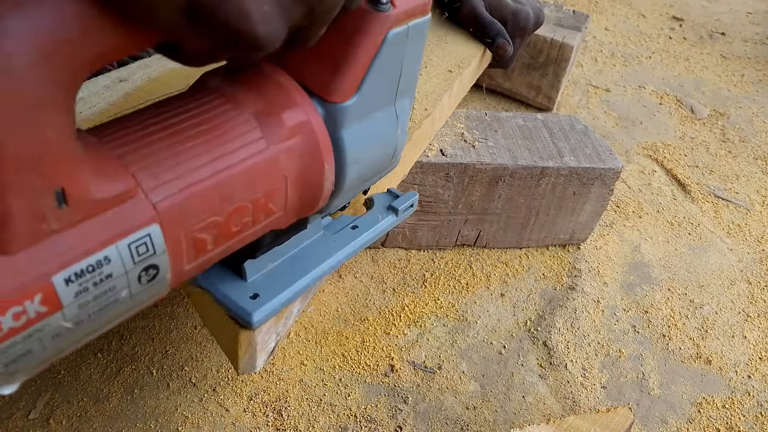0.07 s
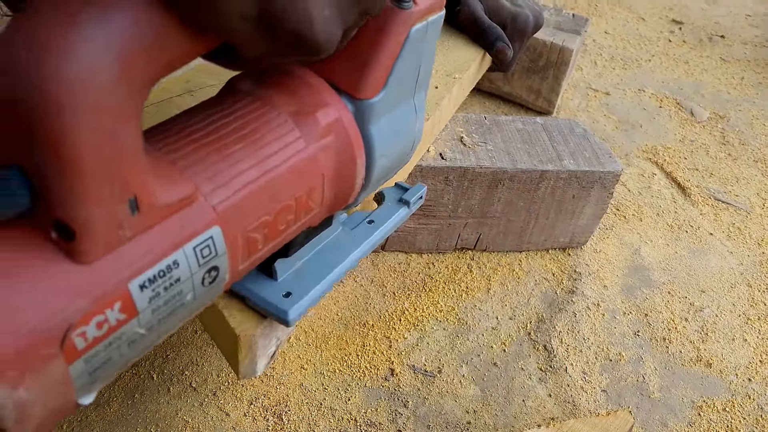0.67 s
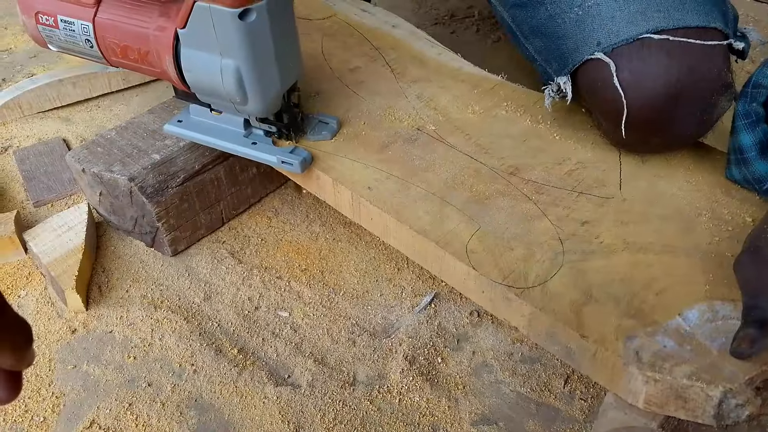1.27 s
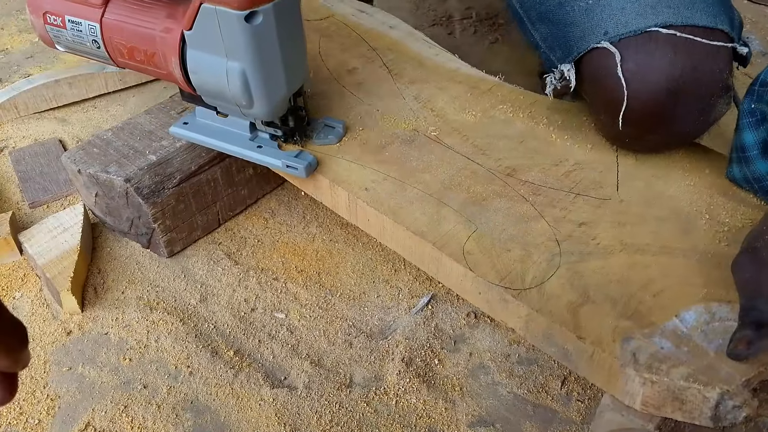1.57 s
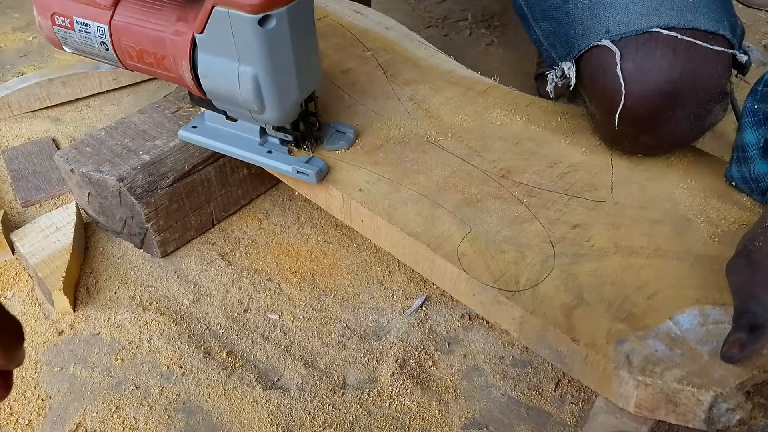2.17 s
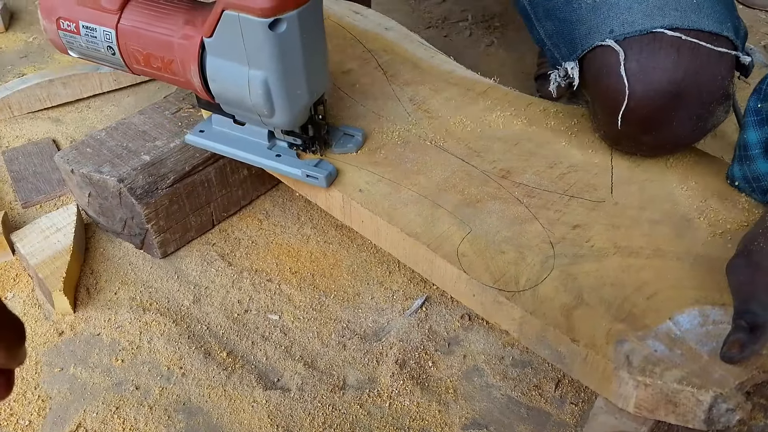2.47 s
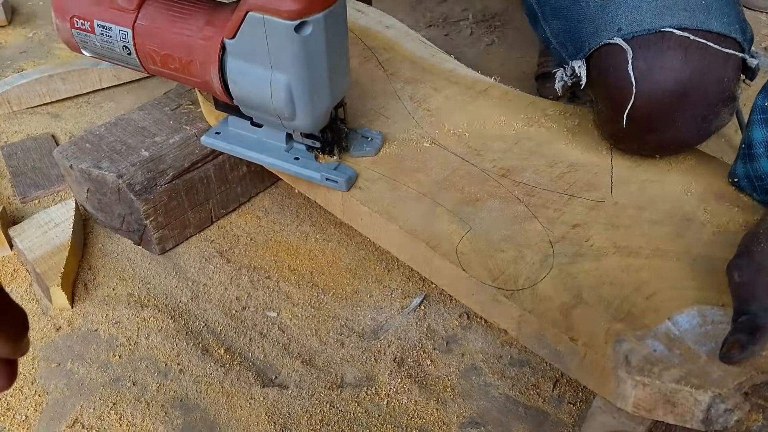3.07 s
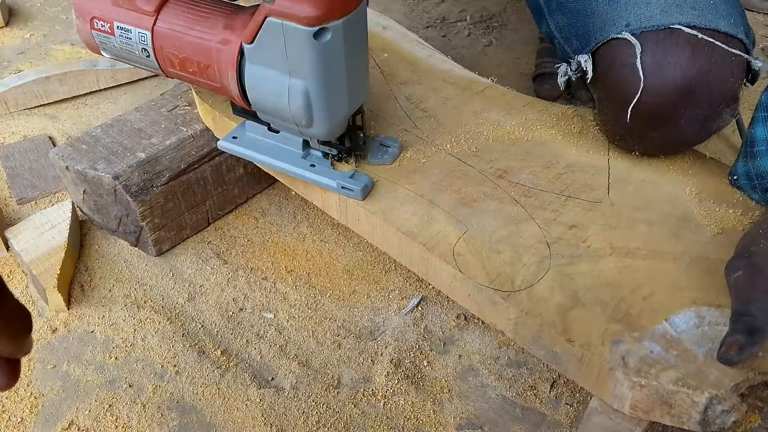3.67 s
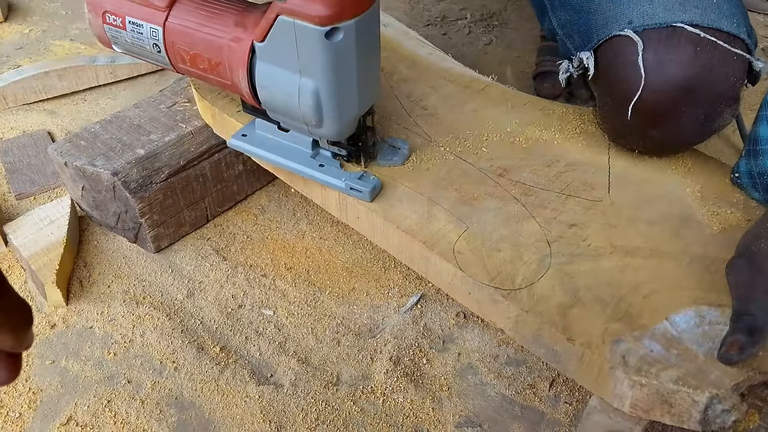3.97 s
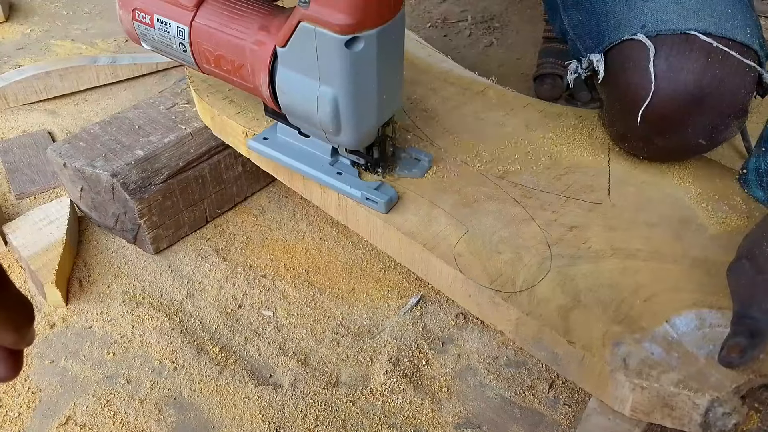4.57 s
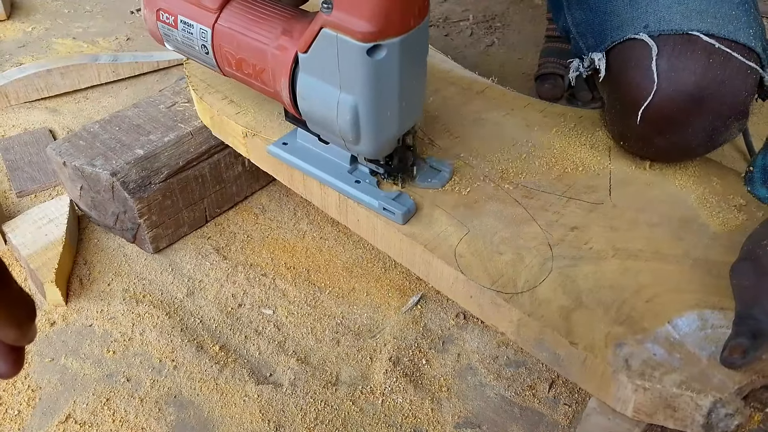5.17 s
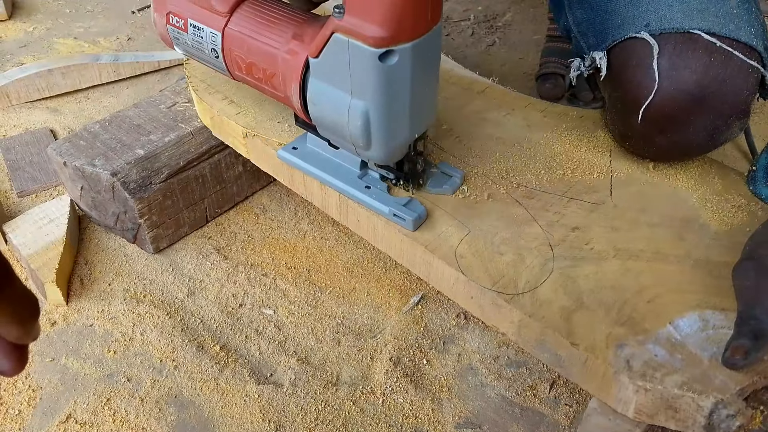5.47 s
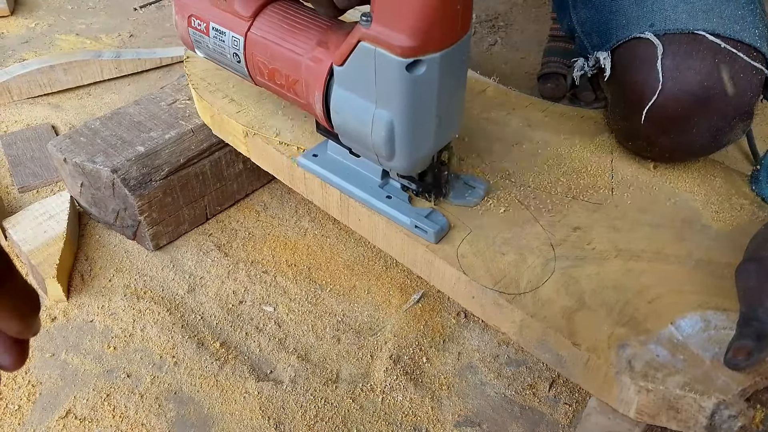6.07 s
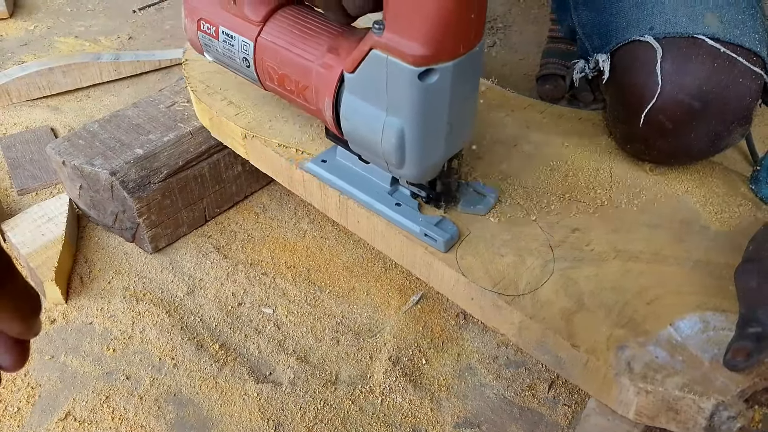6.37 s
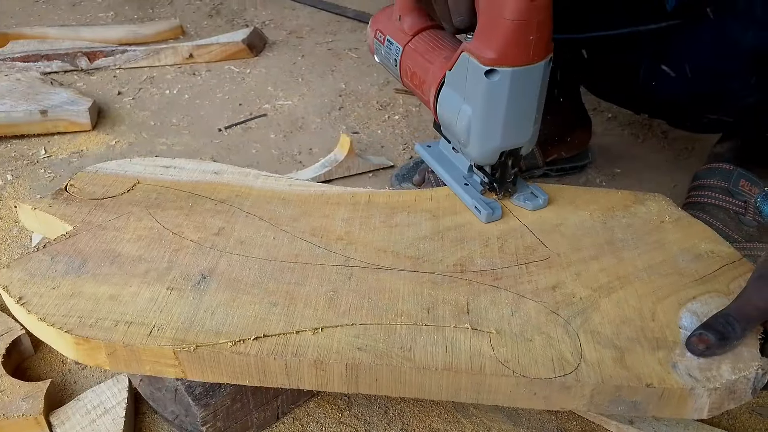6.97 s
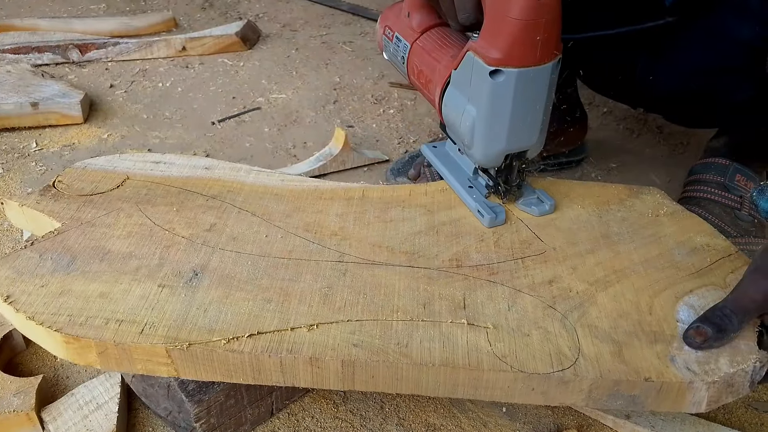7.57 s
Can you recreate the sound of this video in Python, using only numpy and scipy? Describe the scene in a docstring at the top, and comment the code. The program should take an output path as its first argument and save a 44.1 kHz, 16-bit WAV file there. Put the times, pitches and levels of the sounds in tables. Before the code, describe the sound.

An electric jigsaw is cutting a thick wooden plank right from the start, at a fairly slow speed: rapid blade knocks and the rasp of teeth in wood, with a high squeal and gear whine pulsing along. At about 0.7 seconds it breaks off for an instant. By 0.9 seconds it is back, faster and close, a bright, gritty buzz at a steady level. Thin squeals and ringing wood tones come and go as the cut moves along, and the strokes blur into a rougher rasp when the blade binds. The saw's base bumps faintly on the plank now and then, with quick runs of dull thumps from about 4.7 to 6.5 seconds. Around 6.5 seconds the sound dips briefly, then the fast sawing continues from a little farther off, growing slightly louder until it stops at about 7.8 seconds.

```python
"""An electric jigsaw cuts a thick plank. 0-0.7 s, slow: the blade knocks at each turn of its stroke,
its teeth rasp through the wood; blade squeals and gear-mesh whine pulse with each half-stroke.
0.8-6.6 s, fast and close: these tones and plank resonances come and go along the cut;
now and then the shoe bounces on the wood. 6.6-7.8 s: still fast, heard from farther off."""
import sys
import numpy as np
from scipy import signal
from scipy.fft import irfft
from scipy.io import wavfile
from scipy.ndimage import uniform_filter1d, map_coordinates

SR = 44100
rng = np.random.default_rng(int(sys.argv[2]) if len(sys.argv) > 2 else 0)


def dump_mix(stems):
    """Bounce the given channels to the path in sys.argv[1] as a 16-bit WAV at rate SR."""
    frames = np.atleast_2d(stems).T  # one column per channel
    limited = np.clip(frames, -1, 1)  # hard clip at full scale
    pcm = np.round(limited * 32767).astype(np.int16)
    wavfile.write(sys.argv[1], SR, pcm)


N = 345303

# stretches of sawing: start/s, end/s, level/dB, swell/(dB/s), attack/s, offset at onset/dB, release/s
STRETCHES = [(0, 0.692, -25, -0.5, 0.0027, 2, 0.014), (0.826, 6.56, -24, 0.2, .14, -24.5, 0.11),
             (6.55, 7.83, -27.5, 4, 0.085, -10, .01)]
# blade speed, per stretch: t/s, half-stroke rate/Hz
STROKE_RATES = [
    [(0.0, 72.65), (0.288, 72.27), (0.388, 73.2), (0.69, 73.4)],
    [(0.9, 100.6), (1.16, 101.8), (1.46, 103.6), (1.73, 104.8), (1.98, 105.6), (2.6, 102.8), (2.8, 100.5),
     (2.96, 100), (3.22, 100.7), (4.33, 101.1), (4.6, 101.2), (5.08, 101.7), (5.25, 102.3), (5.8, 100.9),
     (5.97, 101.4), (6.5, 101)],
    [(6.6, 105), (6.762, 103.2), (7.106, 105.3), (7.578, 103.4), (7.758, 101.4), (7.82, 101.6)],
]
# grip of the kerf on the blade: t/s, binding/(0-1)
BINDING = [(.06, 0.25), (.28, 0), (.55, 0.57), (.85, 0.45), (1.5, 0.07), (2.3, 0.06), (2.8, 0.29),
           (4.2, 0.22), (4.85, 0.56), (5.2, 0.51), (5.7, 0.55), (6.45, 0.65), (6.65, 0.3), (7.25, 0.21),
           (7.83, 0.61)]
# knock relative to rasp: f/Hz, level/dB
KNOCK_BALANCE = [(100, -10.5), (330, -6.5), (520, 2), (900, 1.5), (2000, -0.5), (4000, -0.5), (5500, -0.5),
                 (7000, 6.5), (10000, -16)]
# teeth catching in the grain: t/s, half-length/s, extra bite/dB
CATCHES = [(6.381, 0.099, 2), (6.734, .03, 7.5), (7.742, 0.18, 2.5)]
# spectrum of saw and plank, per stretch: f/Hz, level/dB
COLOURS = [
    [(30, -34), (150, -27), (380, -22), (560, -12.5), (800, -7), (1000, -16), (1500, -8), (2200, -9),
     (2800, -0.5), (3400, -8), (4500, -1.5), (5400, -6), (6500, -11.5), (9500, -14), (12500, -25),
     (15400, -18)],
    [(30, -27), (100, -22.5), (300, -13.5), (600, -12), (1050, -13), (1400, -10), (2000, -11.5), (2800, -5),
     (3400, -2), (4200, -2.5), (5400, 0), (7200, -11), (9000, -7.5), (10800, -8), (12200, -21.5),
     (13800, -18.5), (15400, -15)],
    [(30, -25), (150, -20.5), (400, -18), (700, -12.5), (1300, -4), (2300, -6.5), (3000, -0.5), (3500, -7),
     (4100, -5.5), (4700, -9.5), (5600, 2), (7000, -6), (9500, -6.5), (12500, -18.5), (15400, -12.5)],
]
# steady resonances, per stretch: f/Hz, width/Hz, gain/dB
STEADY_MODES = [
    [(218, 40, 11.5), (2720, 130, -7), (4040, 260, 7.5)],
    [(929, 77, 7), (2340, 53, 3.5), (4170, 400, 2), (6800, 270, 3)],
    [(583, 87, 5.5), (1340, 70, 6), (1570, 50, 6.5), (2070, 79, 6.5)],
]
# plank resonances and hollows along the cut: middle/s, duration/s, f/Hz, width/Hz, gain/dB
PASSING_MODES = [(1.04, 0.33, 6560, 260, -10), (1.4, 2.5, 7500, 220, -6.5), (0.97, 0.47, 3480, 199, -8),
                 (1.2, 0.8, 8000, 250, 5), (1.4, 1.33, 795, 150, -14), (1.71, 1.92, 2143, 163, -15),
                 (1.8, 0.8, 2690, 170, -12), (1.67, 1.9, 3080, 447, -3.5), (1.63, 1.93, 2900, 105, 11.5),
                 (1.89, 0.72, 625, 60, 6.5), (1.99, 1.27, 2010, 73, 16.5), (2.23, 2.7, 1390, 120, 4),
                 (2.607, 2.72, 501, 57, 10), (2.45, 1.4, 4800, 450, -4.5), (3.3, 1.5, 2034, 160, -12),
                 (3.75, 2.83, 808, 66, 7.5), (3.88, 1.64, 808, 70, 7.5), (4.02, 1.27, 909, 70, 8.5),
                 (3.77, 0.96, 1506, 73.4, 9.5), (3.945, 0.71, 1184, 110, 8.5), (4.518, 0.55, 1440, 110, -8),
                 (5.2, 0.88, 3750, 260, -6), (5.5, 2, 7040, 300, -4.5), (5.096, 0.99, 630, 54, 6.5),
                 (5.5, 2.06, 3500, 230, -4), (5.45, 2.14, 8840, 400.6, 6.5), (5.7, 0.83, 1020, 110, 8),
                 (5.84, 1.4, 5600, 1000, -4.5), (5.9, 1.2, 1630, 130, 9), (6.018, 0.95, 682, 64, 9.5),
                 (6.15, 0.79, 915, 80, 4), (5.83, 1.44, 2720, 180, 4), (6.856, 0.44, 320, 240, -9.5),
                 (6.8, 0.67, 2210, 92, -9), (6.85, .7, 2970, 99, -7), (6.75, 0.68, 6720, 200, -11),
                 (7.55, 0.62, 320, 190, 5), (7.681, 0.64, 5500, 800, 4)]
# tones pulsing with each half-stroke, blade squeals and gear-mesh whine: start/s, end/s, mid f/Hz,
# glide/(Hz/s), fade/s, level re sawing/dB, place in half-stroke/(0-1), burst sharpness, looseness/rad
PULSED_TONES = [(-.1, .75, 2717, 0, .08, -8.5, .95, 1.9, 0.35), (-.1, .75, 3990, 0, .08, -4, 0.3, 6, .7),
                (.17, .28, 3860, 0, .04, -3.5, .3, 2.7, .5), (0, .75, 5300, 0, .08, -9, .2, 4, .9),
                (0.85, 1.33, 4160, 0, .08, -7.5, .1, 1.8, 0.48),
                (1.045, 1.367, 2900, 0, 0.072, -11.5, 0.13, 0.6, 0.33),
                (1.15, 1.9, 5600, 300, .08, -9, .22, 1.9, .55),
                (1.27, 1.733, 3820, 0, .08, -3, 0.06, 2.4, .38),
                (1.0, 1.47, 1370, 0, 0.068, -19, 0, 1.3, 0.52),
                (1.46, 1.74, 1363, 0, .06, -11, 0.28, 0.36, .3),
                (1.72, 2.13, 3890, 0, .06, -7, .05, 2.4, .25),
                (1.8, 2.36, 1374, 0, 0.09, -12.5, .1, 0.59, 0.3),
                (2, 2.71, 4270, -60, 0.067, -2.5, .11, 2.4, 0.24),
                (2, 2.684, 3850, -150, 0.092, -9, 0.05, 2.1, 0.4),
                (2.5, 2.64, 1440, 0, .05, -17, 0, 0.51, 0.4),
                (2.5, 2.98, 1396, 0, 0.061, -13.5, 0.09, 0.8, .4),
                (3, 3.2, 1396, 0, .05, -14.5, 0.08, 0.8, .4), (2.7, 4.4, 4125, 0, 0.11, -15, .1, .6, .2),
                (2.85, 3.08, 3540, 0, .08, -12.5, .05, 1.5, .4),
                (3.114, 4.409, 3785, 0, .08, -11, .05, 0.64, 0.2),
                (3, 4.9, 5300, -100, 0.38, -11.5, .15, 2.6, 0.91),
                (4.88, 5.12, 5250, 0, .06, -9, .15, 3, 0.52),
                (5, 5.28, 4900, -1500, .06, -10.5, 0.1, 3, 0.73),
                (3, 4.5, 4230, 0, .1, -10.5, .15, 1.6, 0.3),
                (4.47, 5.12, 3185, 0, .03, -8.5, .15, 1.6, 0.25),
                (5.08, 5.75, 3160, -50, .25, -9.5, .15, 1.8, .33),
                (5.5, 6.42, 3130, 0, .2, -17.5, .15, .8, .35),
                (5.077, 5.945, 4090, 0, .08, -10.5, 0.24, 2.7, 0.67),
                (5, 5.45, 1350, 0, .08, -21, 0.09, 0.48, 0.31), (4.45, 5.9, 3845, 0, .1, -21, .1, .4, .15),
                (5.68, 5.91, 1615, 0, 0.086, -12, .1, 0.38, 0.21),
                (5.92, 6.52, 3850, 0, .08, -11.5, 1, 1, 0.22),
                (5.88, 6.54, 4150, 0, 0.096, -7.5, .1, 2.1, .45),
                (6.62, 7.65, 3095, -80, .1, -14, .25, 1.4, 0.33),
                (6.7, 7.9, 5730, -540, .15, -10, 0.1, 5, 1.3)]
# gear whine, relative levels: t/s, mesh tone/dB, octave/dB
GEAR_LEVELS = [(0, -12, -3), (.69, -23, -20), (.85, -9, -19), (1.5, -7.5, -22), (2.4, -15, -40),
               (2.9, -8.5, -38), (3.9, -15, -31), (4.6, -16.5, -18), (5.5, -19, -11), (6.3, -18, -26),
               (6.9, -24, -6.5), (7.83, -18, -21)]
# runs of shoe bounces: start/s, count, level/dB, ring f/Hz
BOUNCES = [(0.942, 1, -36, 362), (2.32, 1, -44, 174), (2.376, 3, -32, 355), (2.775, 1, -40, 206),
           (2.82, 1, -41, 175), (3.265, 1, -41, 181), (3.305, 1, -42, 185.1), (3.822, 1, -36, 398),
           (4.718, 9, -38, 361), (5.605, 2, -34.5, 355), (5.654, 2, -37, 413), (5.934, 6, -36, 361),
           (6.675, 1, -47, 180)]


def gain_of(db):
    """Decibels to amplitude."""
    return 10 ** (np.asarray(db) / 20)


def unit_rms(x):
    """Scales to rms 1."""
    return x / np.sqrt(np.mean(x ** 2) + 1e-20)


def spectrum_gain(points, hz):
    """Amplitude from a dB table, interpolated over log frequency."""
    f, db = np.transpose(points)
    return gain_of(np.interp(np.log(hz + 1), np.log(f + 1), db))


def follow(rows, t):
    """Table columns at times t."""
    times, *columns = np.transpose(rows)
    return [np.interp(t, times, column) for column in columns]


def add(mix, start_s, sound):
    """Mixes a sound in at start_s."""
    part = mix[max(round(start_s * SR), 0):][:len(sound)]
    part += sound[:len(part)]


def wander(t, hz):
    """Smooth random curve, rms 1, about hz changes a second."""
    knots = (t - t[0]) * hz
    return unit_rms(map_coordinates(rng.standard_normal(8192), [knots], order=2, mode="wrap"))


def by_binding(t, free, bound):
    """Moves from free to bound as the kerf grips the blade."""
    return free + (bound - free) * np.clip(follow(BINDING, t)[0], 0, 1)


def knocks(half_strokes, distinct, partials=120, shapes=24, spread=0.63, scatter=0.82, ringing=0.871):
    """The blade knocks each half-stroke, tight or rattling; low partials ring through the cycle."""
    low = 1 / (1 + (np.arange(1, partials + 1) / 20) ** 4)
    steps, chance = rng.random((2, partials))
    # delays in cycles: neighbouring partials together in a tight knock, scattered in a loose one
    rattle = spread / 2 * signal.sawtooth(2 * np.pi * np.cumsum(0.26 * steps), 0.5)
    loose = np.linspace(0, scatter, shapes)[:, None]
    delay = rattle * (1 - low) + (chance - 0.5) * (ringing * low + loose * (1 - low))
    spectra = np.pad(np.exp(-2j * np.pi * np.cumsum(delay, axis=1)), [(0, 0), (1, 0)])
    cycles = irfft(spectra, 4096) * 2048
    position = [(1 - distinct) * (shapes - 1), half_strokes % 1 * cycles.shape[1]]
    return map_coordinates(cycles, position, order=1, mode="nearest")


def rasp(t, half_strokes, distinct, depth_db=4.0, chips_db=1.42, lag_cycles=0.19):
    """Teeth tear the fibres in a noise burst just after each knock."""
    burst_db = depth_db * distinct * np.cos(2 * np.pi * (half_strokes - lag_cycles))
    return unit_rms(rng.standard_normal(len(t)) * gain_of(burst_db + chips_db * wander(t, 700)))


def catch_db(t):
    """Short swells of bite where the teeth catch."""
    return sum(db * np.exp(-((t - at_s) / half_s) ** 2) for at_s, half_s, db in CATCHES)


def resonance_db(t, f, modes, fade_s=0.19, patchy_db=3.0, patchy_hz=1500):
    """Steady and passing resonances of saw and plank, plus faint random high ones."""
    def peak(centre_hz, width_hz, db):
        return db * np.exp(-2 * ((f - centre_hz) / width_hz) ** 2)
    steady = sum(peak(*mode) for mode in modes)
    passing = sum(peak(*mode) * np.clip((length_s / 2 - abs(t - middle_s)) / fade_s + 0.5, 0, 1)
                  for middle_s, length_s, *mode in PASSING_MODES)
    patches = uniform_filter1d(rng.standard_normal((len(f), len(t))), size=6, axis=0)
    patches = unit_rms(uniform_filter1d(patches, size=36, axis=1))
    return steady + passing + patchy_db * patches * f / (f + patchy_hz)


def body(t, knock, teeth, colour, modes, bite_hz=2400, ring_hz=1500):
    """The knock shakes the whole plank; the teeth reach mostly its high resonances."""
    hz, frame_s, (knock, teeth) = signal.stft([knock, teeth], SR, nperseg=2048, noverlap=1536)
    frame_s, f = frame_s + t[0], hz[:, None]
    ring_db = resonance_db(frame_s, f, modes)
    tone, balance = spectrum_gain(colour, f), spectrum_gain(KNOCK_BALANCE, f)
    bite_db = (by_binding(frame_s, free=-6, bound=5.5) + catch_db(frame_s)) / (1 + (f / bite_hz) ** 2)
    teeth_db = bite_db + np.minimum(ring_db, ring_db * f / (f + ring_hz))
    drive = (balance * knock * gain_of(ring_db) + teeth * gain_of(teeth_db)) / np.sqrt(1 + balance ** 2)
    treble_rms = np.sqrt(np.mean((tone * gain_of(ring_db)) ** 2 * (f > 2000), axis=0))
    return signal.istft(drive * tone / treble_rms, nperseg=2048, noverlap=1536)[1][:len(t)]


def pulsed_tone(t, half_strokes, rate_hz, row, drift_per_rad=0.004, detune_per_rad=0.014,
                scatter_db=1.5, waver_db=1.74):
    """Blade squeal or gear-mesh whine: one burst each half-stroke, less alike the looser the tone."""
    start_s, end_s, mid_hz, glide_hz_per_s, fade_s, level_db, place, sharpness, loose_rad = row
    active = (t > start_s - fade_s / 2) & (t < end_s + fade_s / 2)
    chance, out = rng.standard_normal((1024, 3)), np.zeros(len(t))
    if active.any():
        now = t[active]
        index, progress = np.divmod(half_strokes[active] - place + 0.5, 1)
        slip, higher, harder = chance[index.astype(int) % len(chance)].T
        pitch_hz = mid_hz + glide_hz_per_s * (now - (start_s + end_s) / 2)
        pitch_hz *= 1 + loose_rad * (drift_per_rad * wander(now, 9) + detune_per_rad * higher)
        phase = 2 * np.pi * pitch_hz * (progress - 0.5) / rate_hz[active] + loose_rad * slip
        burst = np.sin(np.pi * progress) ** sharpness
        burst *= gain_of(scatter_db * harder + waver_db * wander(now, 14.04))
        gate = np.clip(np.minimum(now - start_s, end_s - now) / fade_s + 0.5, 0, 1)
        out[active] = gain_of(level_db) * gate * unit_rms(burst * np.sin(phase))
    return out


def gear_whine(t, half_strokes, mesh_order=37, trim_db=-2, third_db=-25, backlash_rad=0.5):
    """Mesh tone and overtones, loaded at each half-stroke, wavering with the play of the gears."""
    first_db, second_db = follow(GEAR_LEVELS, t)
    mesh = 2 * np.pi * mesh_order * half_strokes + backlash_rad * wander(t, 40)
    load = unit_rms(1 + 0.69 * np.cos(2 * np.pi * half_strokes) + 0.15 * wander(t, 110))
    loaded = load * (gain_of(first_db) * np.sin(mesh) + gain_of(second_db) * np.sin(2 * mesh))
    return np.sqrt(2) * (gain_of(trim_db) * loaded + gain_of(third_db) * np.sin(3 * mesh))


def envelope_db(t, rate_hz, level_db, swell_db_per_s, attack_s, onset_db, release_s,
                release_db=-13, speed_db_per_hz=0.16, catch_share=0.22):
    """Attack, sloping hold, release; louder when the blade runs fast or catches."""
    attack = np.clip(1 - (t - t[0]) / attack_s, 0, 1)
    release = np.clip(1 - (t[-1] - t) / release_s, 0, 1)
    hold_db = level_db + swell_db_per_s * (t - t.mean()) + speed_db_per_hz * (rate_hz - rate_hz.mean())
    return hold_db + onset_db * attack + release_db * release + catch_share * catch_db(t)


def jigsaw(stretch, rates, colour, modes, drift=0.001992, jitter_cycles=0.00053, waver_db=1.21):
    """One stretch: knock and rasp through the body, pulsed tones and gear whine beside them."""
    start_s, end_s, *envelope = stretch
    t = np.arange(round(start_s * SR), round(end_s * SR)) / SR
    rate_hz = follow(rates, t)[0]
    distinct = by_binding(t, free=0.73, bound=0.12)  # binding smears the strokes
    half_strokes = np.cumsum(rate_hz * (1 + drift * wander(t, 25))) / SR
    knock = knocks(half_strokes + jitter_cycles * wander(t, 130), distinct)
    knock *= gain_of(waver_db * wander(t, 90))
    knock *= 2 * np.sqrt(rate_hz / SR)  # same power per Hz as the rasp
    cut = body(t, knock, rasp(t, half_strokes, distinct), colour, modes)
    tones = sum(pulsed_tone(t, half_strokes, rate_hz, row) for row in PULSED_TONES)
    sound = (cut + tones + gear_whine(t, half_strokes)) * gain_of(envelope_db(t, rate_hz, *envelope))
    return sound * signal.windows.tukey(len(t), 200 / len(t))


def shoe_bounce(level_db, ring_hz, swell_s=0.013, t60_s=0.056, thud_hz=(160, 520), trim_db=-1.5):
    """The plank swells into a short low ring under the shoe, with a dull thud."""
    t = np.arange(SR // 6) / SR
    band = signal.butter(2, thud_hz, "band", fs=SR, output="sos")
    thud = unit_rms(signal.sosfilt(band, rng.standard_normal(len(t))))
    shape = (1 - np.exp(-(t / swell_s) ** 2)) * gain_of(-60 * t / t60_s)
    ring = np.sin(2 * np.pi * ring_hz * t)
    return gain_of(level_db + trim_db) * shape / shape.max() * (ring + 0.44 * thud)


def shoe_chatter(mix, gap_s=0.0975, scatter_s=0.0042, scatter_db=2, detune=0.04):
    """The shoe bounces singly or in slightly uneven runs."""
    for start_s, count, level_db, ring_hz in BOUNCES:
        for k, (late, harder, higher) in enumerate(rng.uniform(-1.07, 1, (count, 3))):
            thump = shoe_bounce(level_db + scatter_db * harder, ring_hz * (1 + detune * higher))
            add(mix, start_s + k * gap_s + scatter_s * late, thump)


def scene():
    """Three stretches of sawing plus shoe bounces, mono."""
    mix = np.zeros(N)
    for stretch, rates, colour, modes in zip(STRETCHES, STROKE_RATES, COLOURS, STEADY_MODES):
        add(mix, stretch[0], jigsaw(stretch, rates, colour, modes))
    shoe_chatter(mix)
    return mix[None]


def record(dry, cutoff_hz=15680):
    """Steep low-pass."""
    lowpass = signal.firwin(511, cutoff_hz, window=("kaiser", 9), fs=SR)
    return signal.oaconvolve(dry, lowpass[None], "same")


dry = scene()
out = record(dry)
dump_mix(out)
```